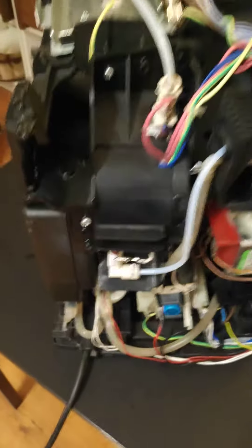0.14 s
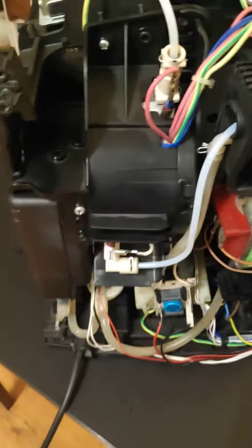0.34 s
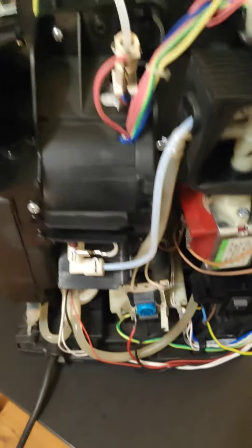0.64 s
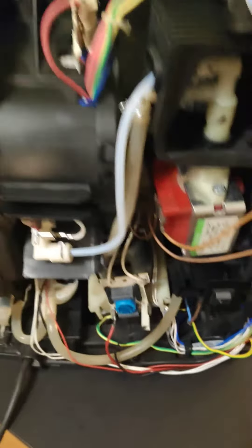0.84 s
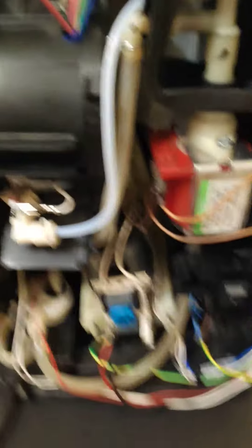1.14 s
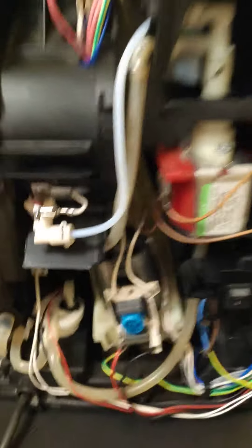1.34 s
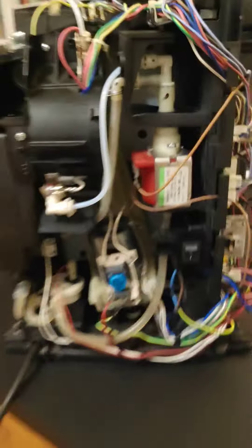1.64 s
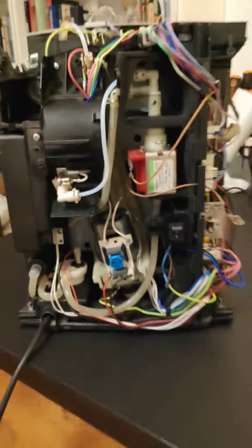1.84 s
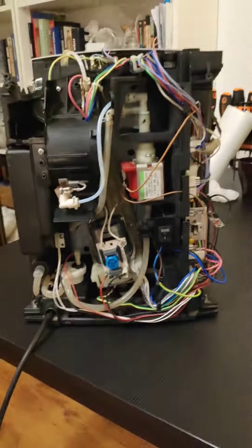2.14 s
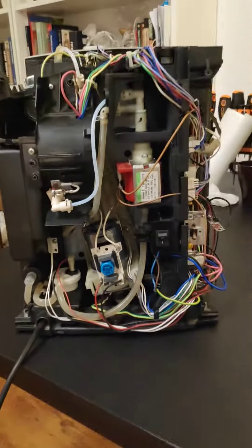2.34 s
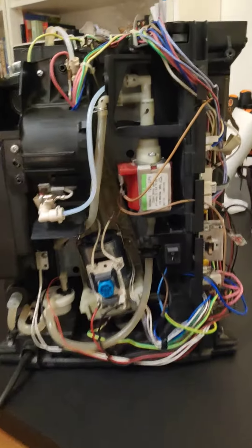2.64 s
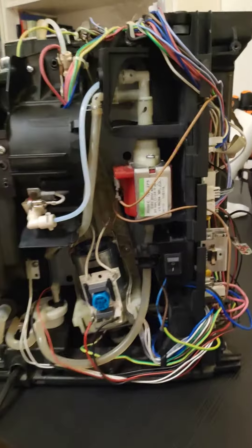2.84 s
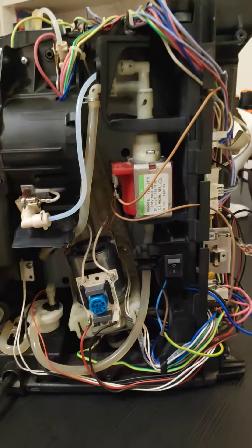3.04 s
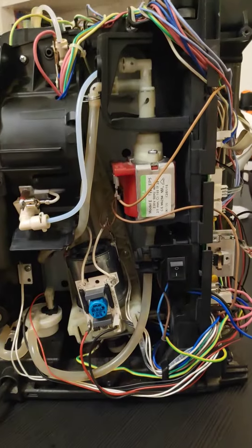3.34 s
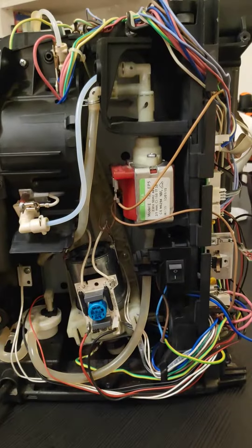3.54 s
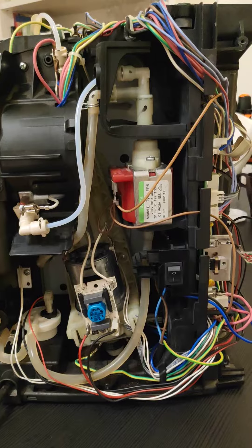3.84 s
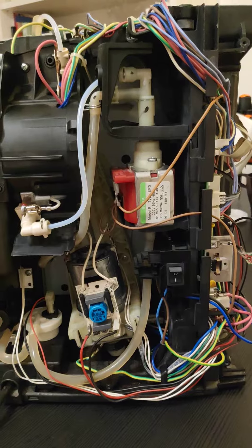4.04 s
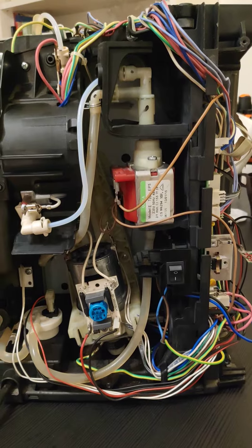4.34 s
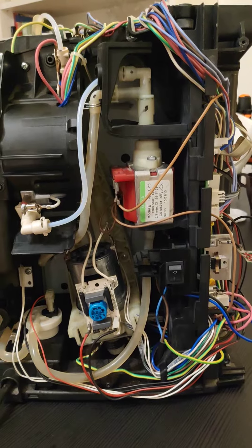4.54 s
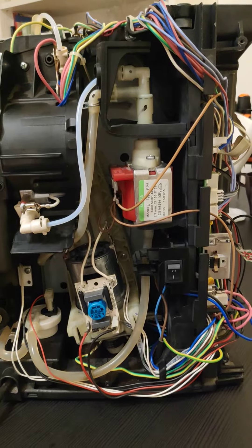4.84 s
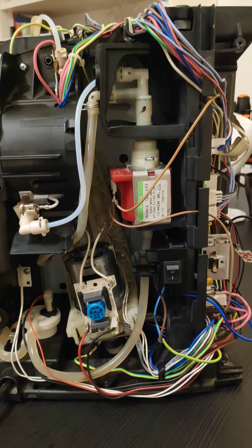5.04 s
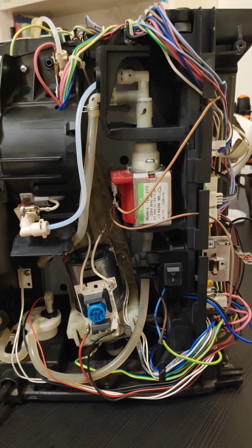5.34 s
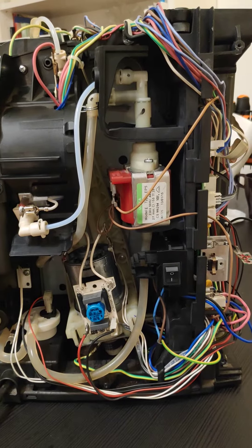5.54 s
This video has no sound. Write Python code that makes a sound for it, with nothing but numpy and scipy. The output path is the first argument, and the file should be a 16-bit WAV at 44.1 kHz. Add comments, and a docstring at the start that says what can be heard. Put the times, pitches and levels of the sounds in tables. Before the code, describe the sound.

Close to an opened coffee machine in a small room, a geared motor whines with rattle and brush hiss, sags slightly under load, then drops quickly in pitch and stops. Brief rough buzzes and bright relay clicks follow. After a quiet pause, a solenoid clacks hard several times in quick succession and a vibration pump begins to tick and hum. Handheld stereo microphone nearby.

```python
"""A small geared motor whirs, labours and brakes to a stop over a mains hum, in an opened coffee machine.
Swaying gear tones, rattle and brush hiss follow its shaft speed; short rough buzzes are pulse trains with
noise: parts judder as it runs, then it pulses and jogs briefly after it stops. Relays click as noise bursts;
after a pause a solenoid clacks shut and a vibration pump ticks at mains rate. A small room adds a short
noise tail; still air and a deep rumble lie beneath."""
import sys
import numpy as np
from scipy import signal
from scipy.fft import rfft, irfft, next_fast_len
from scipy.io import wavfile
from scipy.ndimage import uniform_filter1d

SR = 44100
rng = np.random.default_rng(int(sys.argv[2]) if len(sys.argv) > 2 else 0)


def put_to_file(sound):
    """Save the sound as 16-bit audio at rate SR, in the file named by the first command-line argument."""
    columns = np.atleast_2d(sound).T  # one column per channel
    safe = np.clip(columns, -1, 1)
    whole_steps = np.round(safe * 32767)
    wavfile.write(sys.argv[1], SR, whole_steps.astype(np.int16))


N = 251370
T = np.arange(N) / SR
MAINS_HZ = 50
FREE_HZ = 58.19  # shaft turns per second at the start

# left minus right, motor side of the machine: f/Hz, difference/dB
MOTOR_SIDE = [(400, 4.5), (700, -5), (1250, 4), (1700, 0), (4500, -1), (7300, -8), (9200, 2), (11200, 13.5),
              (14000, 18.5)]
# left minus right, valve side of the machine: f/Hz, difference/dB
VALVE_SIDE = [(400, -14), (2400, 2), (4500, -3), (7500, -11.5), (10000, 3), (13000, 11)]
# left minus right, central sources: f/Hz, difference/dB
CENTRE = [(100, 0.99), (10000, 0.25)]
# low body colour, shared by buzzes and water: f/Hz, relative level/dB
SHUDDER_COLOUR = [(50, -13.5), (100, -2.5), (180, -2.5), (290, -0.5), (400, -3.5), (560, 0.5), (800, -11.5),
                  (1500, -30), (4000, -55)]


def motor():
    """Gear teeth whine, an off-centre wheel makes them throb, the brushes hiss once a turn."""
    # gear tones: multiple of shaft rate, relative level free/dB, loaded/dB, near stall/dB, phase sway/rad
    gears = [(6.08, -34, -22, -20, .05), (10.276, -11, -12, -14, 0.09), (11.985, -10, -11, -3.5, 0.028),
             (13.45, -19, -19, -11, 0.36), (14.19, -14.5, -15.5, -14, 0.37), (21.85, -4, -2, -3.5, 1.68),
             (43.65, -22, -12.5, -17, 2.7), (48, -18.5, -30, -30, .1), (95, -23, -38, -40, .2),
             (131, -34, -27, -34, 8.7)]
    # gear rattle: f/Hz, relative level/dB
    gear_colour = [(50, -20), (100, -9), (150, -13), (270, -4.5), (350, -4), (600, -3), (820, -2),
                   (1020, -8.5), (1450, -14.5), (2200, -15.5), (3000, -16.5), (4300, -18.5), (7000, -12.5),
                   (13000, -25.5)]
    # brush hiss: f/Hz, relative level/dB
    brush_colour = [(3000, -21), (7500, -26), (9000, -3.5), (10200, 0.5), (11400, 6.5), (12400, 1),
                    (13300, 8), (14400, -7)]
    # housing resonances: f/Hz, width/Hz, lift/dB
    housing = [(721, 30, 2.5), (1244, 100, 2), (1622, 107, 9), (2020, 140, 4), (2520, 250, 7.5),
               (2784, 130, 8), (3294, 120, 4), (7140, 120, 3)]
    wobble, uneven, chatter, jitter_rad = 1.12, .2, .16, .13
    throb, rasp, brush_swing = .5, .2, .16
    ear_lag_s = .0002

    hz = shaft_speed()
    turn = 2 * np.pi * np.cumsum(hz) / SR
    wheel = turn * 22 / 54  # reduction gear
    load = strain(hz)
    # strained teeth run rough
    roughness = chatter * (1 + 2 * load) * walk(240)
    sway = wobble * np.sin(wheel) + uneven * wear(wheel, count=14) + roughness

    teeth = 0
    for order, free_db, loaded_db, stall_db, depth in gears:
        phase = order * turn + depth * sway + jitter_rad * walk(25.64)
        # the wheel leans on the teeth once per wheel turn
        pressure = 1 + min(depth, 1) * (throb * np.sin(wheel) + rasp * walk(220))
        running_db = free_db + engaged() * (loaded_db - free_db)
        db = running_db + load * (stall_db - loaded_db) + walk(90)
        ear_phase = 2 * np.pi * np.minimum(order * hz * ear_lag_s, 1 / 4)
        teeth = teeth + amp(db) * pressure * tone(phase, ear_phase)

    once_a_turn = 1 + brush_swing * np.sin(turn)
    rattle = radiate(noise() * once_a_turn * amp(1.5 * walk(400)), gear_colour, MOTOR_SIDE)
    brushes = radiate(noise() * once_a_turn * amp(walk(700)), brush_colour, MOTOR_SIDE)
    # the gears stop first, the brushes a moment later
    whine_gain = loudness(hz, db=-42.5, per_octave_db=2.5, stop_s=2.205, fade_s=.046)
    rattle_gain = loudness(hz, db=-46, per_octave_db=6.6, stop_s=2.205, fade_s=.046)
    brush_gain = loudness(hz, db=-50, per_octave_db=2.8, stop_s=2.3, fade_s=.075)
    gearbox = ring(whine_gain * teeth + rattle_gain * rattle, housing)
    return bounce(gearbox + brush_gain * brushes) + hum(load)


def shaft_speed():
    """Turns per second: a slow sag, a step down under load, then steady braking."""
    sag_hz_per_s, load_drop_hz = 1.05, 1.8
    brake_s, brake_hz_per_s = 1.675, 41.5
    braking_hz = brake_hz_per_s * np.maximum(T - brake_s, 0)
    hz = FREE_HZ - sag_hz_per_s * T - load_drop_hz * engaged() - braking_hz
    return np.maximum(hz, 10)


def engaged():
    """0 before the gears take up their load, 1 after, with a linear ramp between."""
    load_s, load_takes_s = .87, .1506
    return np.clip((T - load_s) / load_takes_s, 0, 1)


def strain(hz, free_hz=57, stall_hz=35):
    """Load on the motor, 0 running free to 1 near the stall."""
    return np.clip((free_hz - hz) / (free_hz - stall_hz), 0, 1) ** 0.7


def wear(angle, count):
    """Uneven teeth: a random pattern that comes round with every turn."""
    heights = unit(rng.standard_normal(count))
    return np.interp(angle, np.arange(count) * 2 * np.pi / count, heights, period=2 * np.pi)


def loudness(hz, db, per_octave_db, stop_s, fade_s):
    """A motor layer is louder when near and fast, and dies away once its part stops."""
    # nearness of the listening point: t/s, gain/dB
    nearness = [(0, -3), (.3, -1.5), (.85, -0.5), (1.3, 1), (1.6, -0.6), (1.85, -2), (2.3, -2.5)]
    level_db = db + over_time(nearness) + per_octave_db * np.log2(hz / FREE_HZ)
    return amp(level_db) * gate(-1, stop_s, .01, fade_s)


def bounce(x, db=-9, above_hz=3000):
    """A nearby panel mirrors the treble; its peaks and notches shift as the listening point moves."""
    # panel echo: t/s, delay/s
    bounce_delay = [(0, .00135), (.8, .00136), (1.3, .00122), (2.3, .00105)]
    delay_s = over_time(bounce_delay)
    treble = butter(x, above_hz, "high", order=1)
    return x - amp(db) * np.array([np.interp(T - delay_s, T, ear) for ear in treble])


def hum(load):
    """Rectified mains shakes the motor; the harder it labours, the more current it draws."""
    # hum lines: f/Hz, level free/dB, level near stall/dB
    hum_lines = [(100, -70, -68), (200, -57, -62), (300, -59.5, -45), (400, -55.5, -60), (500, -69, -48),
                 (600, -60, -58), (700, -68.5, -60.5)]
    lines = 0
    for f, free_db, stall_db in hum_lines:
        db = free_db + load * (stall_db - free_db) + 1.06 * walk(12.6)
        lines = lines + amp(db) * mains_tone(f, lag_rad=.34)
    return lines * gate(-1, 2.23, .01, .013)


def squeak(start_s=2.155, end_s=2.185, hz=9150, width_hz=600, db=-60):
    """A brief, thin squeak of narrow-band noise just before the gears stop."""
    return amp(db) * gate(start_s, end_s, .003, .015) * unit(bands(noise(), [(hz, width_hz, 0)]))


def buzzes(grit=.88, low_trim_db=-3, unsteady=.03, part_width_hz=70, part_db=8):
    """Short rough buzzes: parts judder as the motor runs, then it pulses and jogs briefly after it stops."""
    # buzzes: t/s, length/s, relative low level/dB, relative high level/dB, pulse f/Hz, resonance f/Hz
    bursts = [(0.581, 0.04, -53, -77, 90.8, 274), (1.411, 0.058, -47, -54, 140, 262),
              (1.523, 0.043, -45, -48, 109.5, 294), (1.566, 0.06, -66, -46, 99.6, 557),
              (2.147, 0.038, -62, -53.5, 98.5, 730), (2.205, 0.11, -56, -66.5, 111.4, 109),
              (2.658, 0.017, -55, -73, 172.5, 387), (2.838, 0.079, -61, -61, 135, 398),
              (2.891, 0.059, -58, -59.5, 135.7, 685)]
    # upper part of the buzz: f/Hz, relative level/dB
    rough_colour = [(200, -7), (600, 0.5), (1600, -5), (3000, -12), (5000, -10.5), (8000, -13.5),
                    (14000, -26.5)]
    low, high = 0, 0
    for start_s, length_s, low_db, high_db, pulse_hz, part_hz in bursts:
        end_s = start_s + length_s
        cycles = np.floor(np.cumsum(pulse_hz * (1 + unsteady * walk(60))) / SR)
        pulses = unit(np.diff(cycles, prepend=0)) * np.array([[1], [.5]])  # one impulse per cycle
        buzz = gate(start_s, end_s, .0015, .025) * (pulses + grit * noise())
        low = low + amp(low_db) * ring(buzz, [(part_hz, part_width_hz, part_db)])
        rustle = gate(start_s, end_s, .014, .063) * noise()
        high = high + amp(high_db) * (buzz / 2 + rustle)
    body = amp(low_trim_db) * radiate(low, SHUDDER_COLOUR, CENTRE)
    return body + radiate(high, rough_colour, MOTOR_SIDE)


def relays():
    """Relay contacts snap over: short bright clicks with a long metallic ring."""
    # clicks: t/s, relative crack/dB, ringing/dB, frame knock/dB, contact f/Hz, width/Hz, lift/dB
    clicks = [(2.532, -41, -50, -72, 12500, 1110, 8.5), (2.7132, -39.5, -55, -50.5, 7600, 1920, 9),
              (2.7185, -45, -57, -61.5, 5570, 300, 14)]
    # click: f/Hz, relative level/dB
    relay_colour = [(500, -15), (1200, -11.5), (2300, -4), (3400, -8), (5000, -1.5), (7000, 0),
                    (9300, -2.5), (12300, -1.5), (14400, -3)]
    # relay resonances: f/Hz, width/Hz, lift/dB
    relay_modes = [(4600, 54, 6), (5120, 45, 10), (5850, 50, 8), (7500, 53, 4.5), (8100, 160, 9.3),
                   (10000, 170, 4.6), (12400, 200, 4)]
    return strikes(clicks, relay_colour, relay_modes, MOTOR_SIDE, crack_s=.0007, ring_s=.042,
                   slide_db=-13, slide_s=.0022, knock_s=.031, boom_s=.036)


def solenoid():
    """A plunger clacks shut: a light touch, then blows about one mains cycle apart."""
    # blows: t/s, relative crack/dB, ringing/dB, frame knock/dB, contact f/Hz, width/Hz, lift/dB
    blows = [(4.696, -48, -49, -75, 7400, 1500, 0), (4.7033, -24, -50, -36.5, 7400, 1200, 8.5),
             (4.7232, -20, -40, -38.5, 7000, 2000, 3), (4.7468, -26, -45, -73, 7900, 1000, 5.5)]
    # blow: f/Hz, relative level/dB
    blow_colour = [(700, -22), (1200, -15), (2900, -16), (4500, -10), (7200, -2.5), (8600, -6), (11500, -6),
                   (14000, -3.5)]
    # plunger resonances: f/Hz, width/Hz, lift/dB
    plunger_modes = [(2216, 100, 6.8), (8460, 330, 2.8)]
    return strikes(blows, blow_colour, plunger_modes, VALVE_SIDE, crack_s=.0031, ring_s=.017,
                   slide_db=-4.5, slide_s=.0017, knock_s=.027, boom_s=.052)


def strikes(table, colour, modes, side, crack_s, ring_s, slide_db, slide_s, knock_s, boom_s):
    """An armature slides briefly, then cracks home; each contact rings, the frame knocks and booms on."""
    # frame knock: f/Hz, relative level/dB
    knock_colour = [(35, -34), (70, -3.5), (150, -5.5), (210, -4), (300, -5.5), (500, -6.5), (900, -7.5),
                    (1400, -13), (2200, -13), (3200, -17), (6000, -39)]
    # frame resonances: f/Hz, width/Hz, gain/dB
    frame_modes = [(109.3, 16, 9), (271.4, 26, 16), (395, 45, 7), (562, 32, 0), (1100, 260, -1.5)]
    metal_db, frame_db, boom_db = -3, -6, -9
    clack, knock, boom = 0, 0, 0
    for s, crack_db, ring_db, knock_db, *contact in table:
        slide = amp(slide_db) * np.exp(-np.abs(T - s) / slide_s) * (T < s)
        crack = gate(s, s + .001, .0001, crack_s)
        ringing = gate(s, s, .0025, ring_s)
        metal = amp(crack_db) * (slide + crack) + amp(ring_db) * ringing
        clack = clack + ring(noise() * metal, [contact])
        knock = knock + amp(knock_db) * gate(s, s + .0042, .0014, knock_s)
        boom = boom + amp(knock_db) * gate(s, s, .00075, boom_s)
    body = amp(frame_db) * noise() * knock + amp(boom_db) * bands(noise() * boom, frame_modes)
    metal_sound = ring(radiate(clack, colour, side), modes)
    return amp(metal_db) * metal_sound + radiate(body, knock_colour, CENTRE)


def pump():
    """The plunger ticks once per mains cycle, its coil hums, water rushes and the valve hisses for a while."""
    # coil lines, snapped to mains harmonics: f/Hz, level once running/dB
    pump_lines = [(102.3, -75), (150.7, -72), (199.2, -72), (301.5, -78), (349.9, -76.5), (398.4, -79),
                  (452.2, -79.5), (549.1, -84), (602.9, -92), (651.4, -84), (699.8, -93), (748.3, -86),
                  (1050, -92), (1152, -90.5)]
    # tick: f/Hz, relative level/dB
    tick_colour = [(600, -32), (1150, -15.5), (1700, -20), (2400, -12.5), (3300, -13), (4000, -16),
                   (5000, -4), (7300, -2.5), (9500, -1.5), (14000, -5)]
    # valve resonances: f/Hz, width/Hz, lift/dB
    valve_modes = [(2200, 47, 8.2), (5100, 200, 3.3), (7140, 360, 8.2), (9300, 220, 6)]
    # hiss bands: f/Hz, width/Hz, relative level/dB
    flow_modes = [(2240, 160, 2), (7100, 700, -6)]
    start_s, bite_s, hiss_end_s = 4.72, 5.14, 5.52
    soft_db, hard_db, ease_db_per_s = -72.5, -59.5, 2.5
    tick_s, rattle, rattle_s, tick_phase_s = .0013, .15, .026, 5.2798

    # soft start, a bite as pressure builds, then easing off; the gates stay open to the end
    pressure = gate(bite_s, 6, .016, .01)
    tick_db = soft_db + pressure * (hard_db - soft_db) - ease_db_per_s * np.maximum(T - bite_s, 0)
    running = gate(start_s, 6, .25, .01)
    age_s = (T - tick_phase_s) % (1 / MAINS_HZ)
    tick = age_s / tick_s * np.exp(1 - age_s / tick_s)
    stroke = unit(tick + rattle * np.exp(-age_s / rattle_s))
    struck = noise() * stroke * amp(tick_db + 2 * walk(60))
    ticks = ring(radiate(struck, tick_colour, VALVE_SIDE), valve_modes)

    coil = sum(amp(db + walk(8.0) / 2) * mains_tone(f, lag_rad=.44) for f, db in pump_lines)
    water = amp(-77) * radiate(noise(), SHUDDER_COLOUR, CENTRE)
    hiss = amp(-76) * unit(bands(noise(), flow_modes)) * gate(start_s, hiss_end_s, .056, .018)
    return running * (ticks + coil + water) + hiss


def room(x, low_t60_s=.51, high_t60_s=.39, wet_db=-11):
    """Walls and table return a short, dense tail; its treble dies first."""
    t = T[:SR // 2]
    echoes = rng.standard_normal((2, len(t))) * (t > .005)
    bass = butter(echoes[0], 430, "low")  # long waves reach both ears alike
    treble = butter(echoes, 400, "high")
    tail = bass * 1000 ** (-t / low_t60_s) + treble * 1000 ** (-t / high_t60_s)
    tail = unit(tail) / np.sqrt(len(t))
    return x + amp(wet_db) * signal.fftconvolve(x, tail, axes=1)[:, :N]


def background():
    """Still air and a deep rumble that wanders and swells, both as coloured noise."""
    # still air: f/Hz, relative level/dB
    air_colour = [(41, -30), (70, -3.5), (91, -11.5), (191, -15.5), (223, -21), (477, -25.5), (545, -28.5),
                  (3040, -34), (13600, -35.5), (14500, -37.5)]
    # deep rumble: f/Hz, relative level/dB
    rumble_colour = [(8, -3), (18, -6.5), (30, -2.5), (42, -10.5), (75, -25), (130, -27), (300, -70)]
    # rumble swells: t/s, half width/s, level/dB
    swells = [(1.45, .15, -64), (2.63, .012, -60), (4.2, 0.36, -59)]
    air_db, rumble_db, wander_db = -72, -67.5, 3
    swell = amp(rumble_db + wander_db * walk(2.98))
    for s, width_s, db in swells:
        swell = np.hypot(swell, amp(db) * np.exp(-((T - s) / width_s) ** 2 / 2))
    air = amp(air_db) * radiate(noise(), air_colour, CENTRE)
    return air + swell * radiate(noise(), rumble_colour, CENTRE, alike_hz=88.5)


def radiate(x, colour, side, alike_hz=900):
    """Two excitations ring a body of this colour; both ears share the bass but not the treble."""
    size = next_fast_len(N + 8192)
    hz = np.maximum(np.arange(size // 2 + 1) * SR / size, 1)

    def read(points):
        f, db = np.transpose(points)
        return np.interp(np.log(hz), np.log(f), db)

    # minimum phase: the body rings only after it is struck
    cepstrum = irfft(np.log(unit(amp(read(colour)))), size)
    cepstrum[1:size // 2] *= 2
    cepstrum[size // 2 + 1:] = 0
    mid, wide = rfft(x, size) * np.exp(rfft(cepstrum))
    sign = np.array([[1], [-1]])
    lean = amp(sign * read(side) / 2)
    lean /= np.sqrt(np.mean(lean ** 2, axis=0))
    ears = mid + sign * wide * hz / np.hypot(hz, alike_hz)
    return irfft(ears * lean, size)[:, :N]


def peak(x, hz, width_hz):
    """One resonance as a band-pass of unit peak gain."""
    return signal.lfilter(*signal.iirpeak(hz, hz / width_hz, fs=SR), x)


def ring(x, modes):
    """Each resonance lifts its own band and rings on."""
    return x + sum((amp(db) - 1) * peak(x, hz, width_hz) for hz, width_hz, db in modes)


def bands(x, modes):
    """Only the resonances themselves."""
    return sum(amp(db) * peak(x, hz, width_hz) for hz, width_hz, db in modes)


def butter(x, hz, kind, order=2):
    """Butterworth low- or high-pass."""
    return signal.sosfilt(signal.butter(order, hz, kind, fs=SR, output="sos"), x)


def tone(phase, lag_rad):
    """A sine of rms 1 that reaches the two ears at different phases."""
    return np.sqrt(2) * np.sin([phase + lag_rad / 2, phase - lag_rad / 2])


def mains_tone(f, lag_rad):
    """The mains harmonic nearest f, at a random phase."""
    hz = MAINS_HZ * round(f / MAINS_HZ)
    return tone(2 * np.pi * hz * T + rng.uniform(0, 2 * np.pi), lag_rad)


def gate(start_s, end_s, rise_s, fall_s):
    """Opens exponentially at the start, dies away exponentially after the end."""
    opening = 1 - np.exp(-np.maximum(T - start_s, 0) / rise_s)
    return opening * np.exp(-np.maximum(T - end_s, 0) / fall_s)


def walk(rate_hz):
    """Slow chance with a spread near 1: held random steps, smoothed twice."""
    k = max(int(SR / rate_hz), 1)
    steps = np.repeat(rng.standard_normal(N // k + 1), k)
    return 1.28 * uniform_filter1d(uniform_filter1d(steps, k), k)[:N]


def noise():
    """Unrelated white noise in two rows."""
    return rng.standard_normal((2, N))


def over_time(table):
    """A two-column table as a line through time."""
    return np.interp(T, *np.transpose(table))


def amp(db):
    """Decibels to gain."""
    return 10 ** (np.asarray(db) / 20)


def unit(x):
    """Scale to rms 1."""
    return x / np.sqrt(np.mean(x ** 2))


def scene():
    """The machine in its room, over the background."""
    machine = motor() + squeak() + buzzes() + relays() + solenoid() + pump()
    return room(machine) + background()


def record(dry):
    """A steep elliptic low-pass cuts the top."""
    return signal.sosfilt(signal.ellip(10, .2, 70, 14250, fs=SR, output="sos"), dry)


dry = scene()
out = record(dry)
put_to_file(out)
```